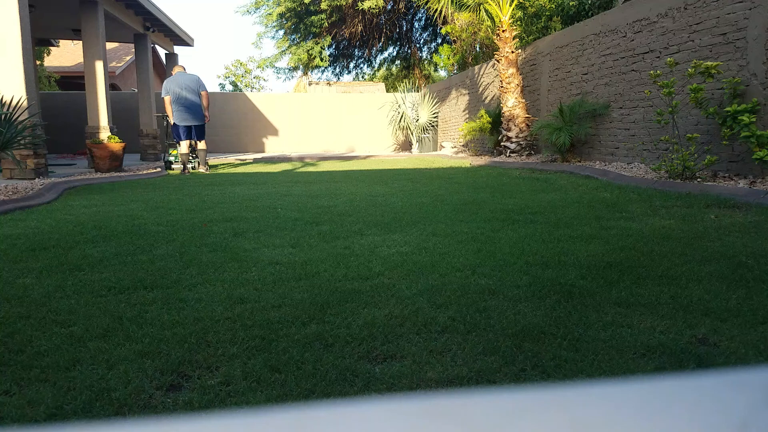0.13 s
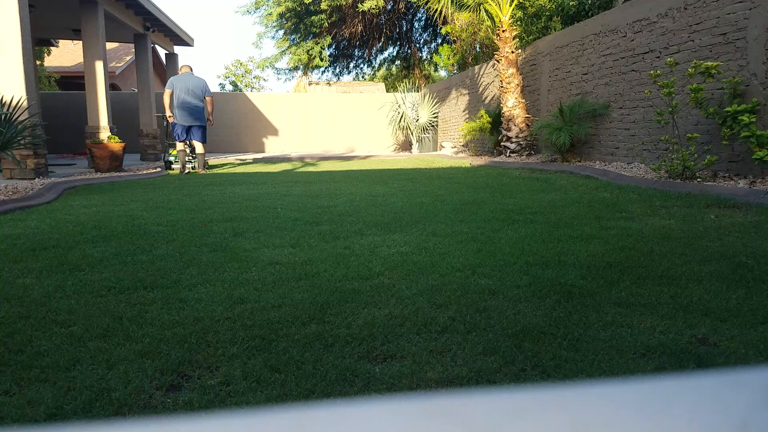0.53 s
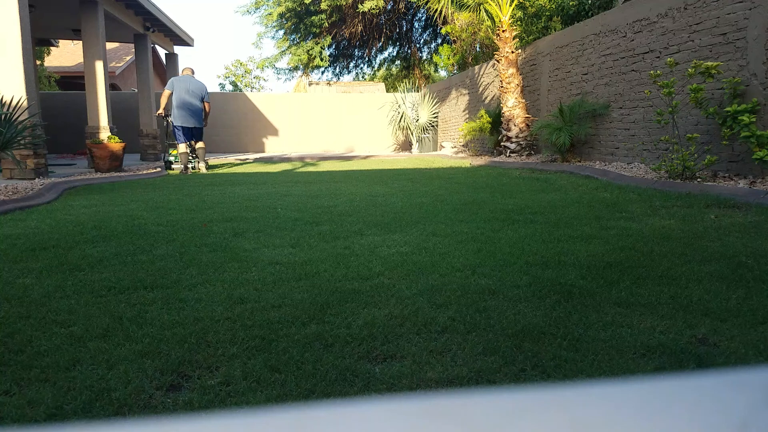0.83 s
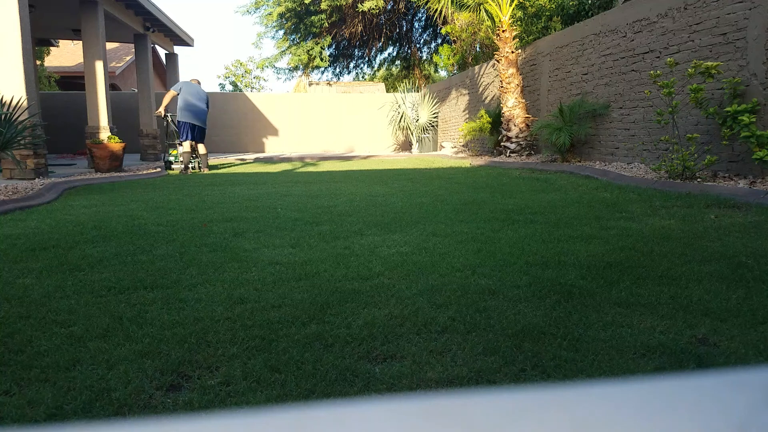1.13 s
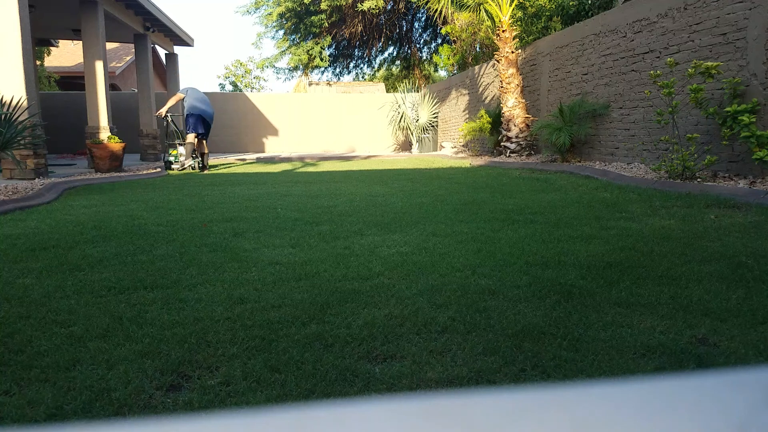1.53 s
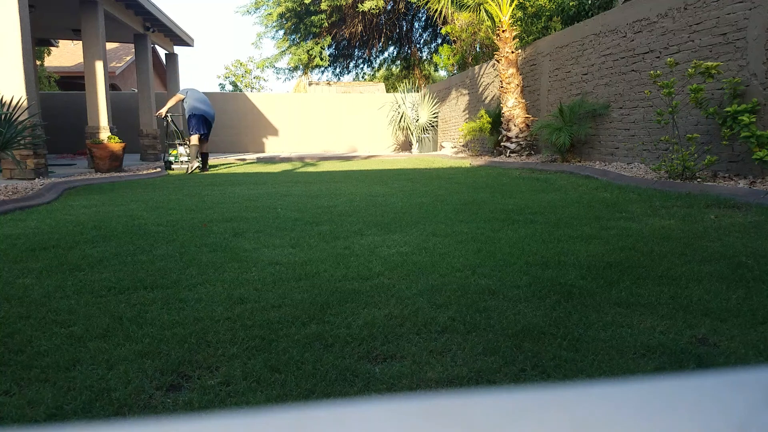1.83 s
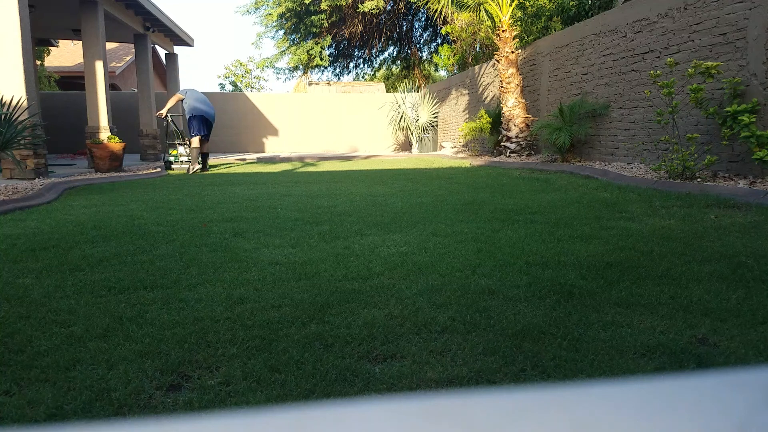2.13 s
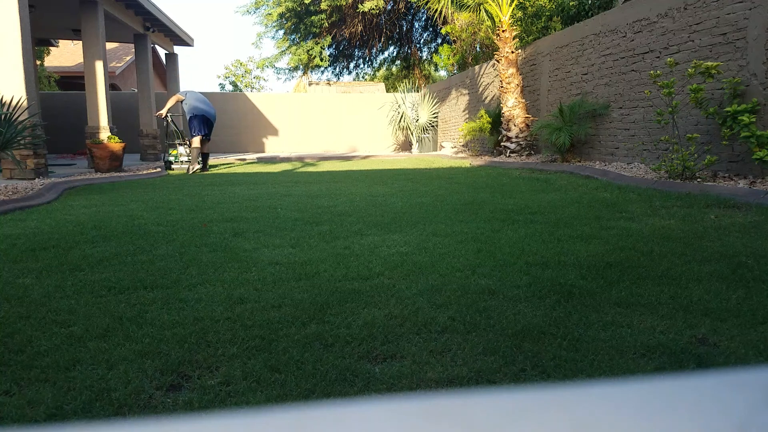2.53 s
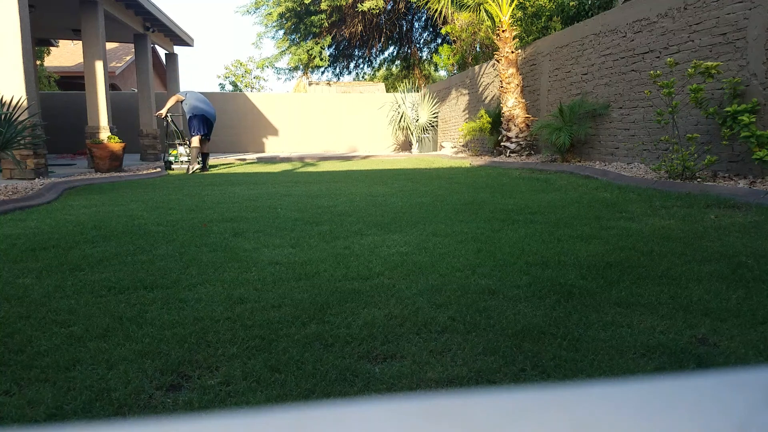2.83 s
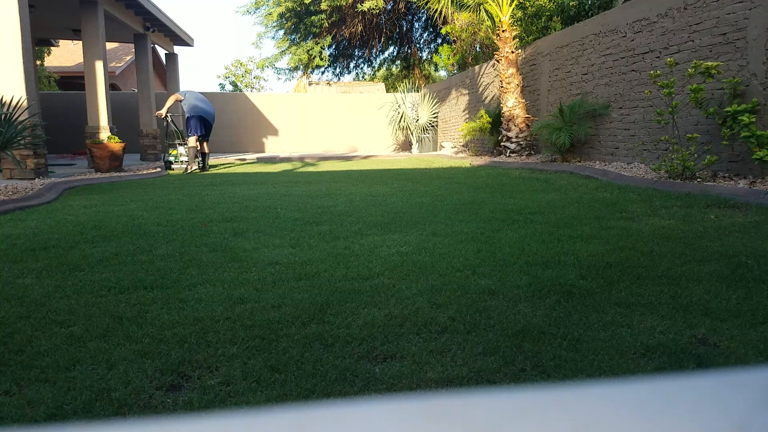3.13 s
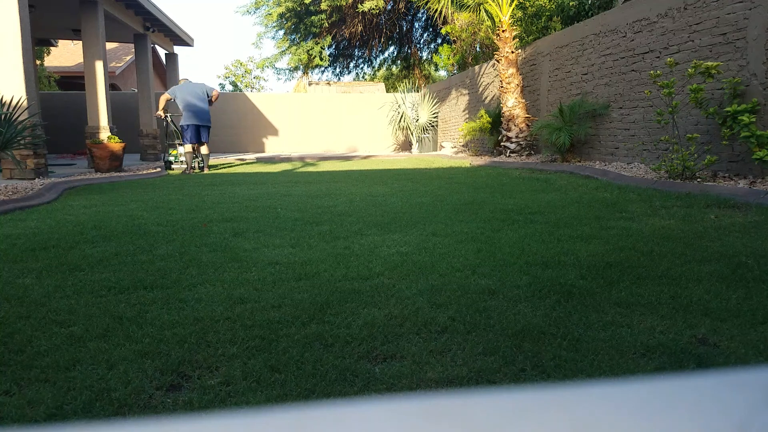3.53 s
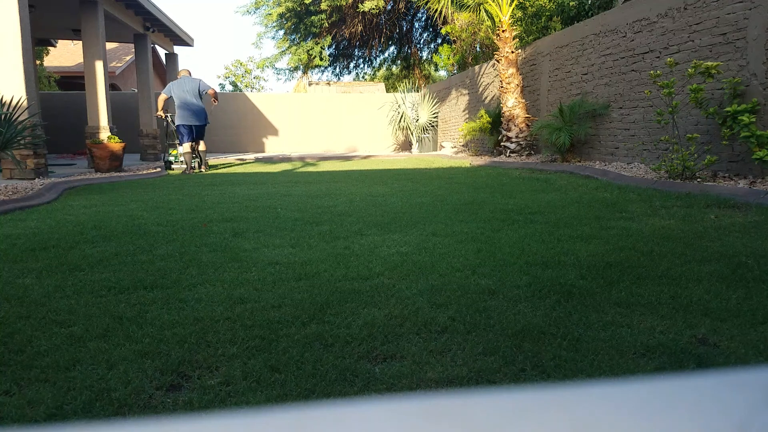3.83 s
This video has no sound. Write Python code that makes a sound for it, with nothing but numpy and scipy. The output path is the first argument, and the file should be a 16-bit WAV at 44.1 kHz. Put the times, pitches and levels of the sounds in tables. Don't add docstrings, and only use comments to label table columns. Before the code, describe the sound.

Petrol mower being started by rope at some distance: lever snap, long pause over a beating hum and far traffic, pawl knocks, steel deck rattle, hissing compressions and fast echoing exhaust blows, heard in stereo outdoors.

```python
import sys
import numpy as np
from scipy import signal
from scipy.fft import rfft, irfft, next_fast_len
from scipy.io import wavfile
from scipy.ndimage import map_coordinates

SR = 44100
rng = np.random.default_rng(int(sys.argv[2]) if len(sys.argv) > 2 else 0)


def gain_from_decibels(decibels):
    exponent = np.asarray(decibels, float) / 20
    return 10 ** exponent


def generate_wav(signal):
    frames = np.transpose(np.atleast_2d(signal))
    scaled = np.clip(frames, -1, 1) * 32767
    pcm = np.round(scaled).astype(np.int16)
    wavfile.write(sys.argv[1], SR, pcm)


N = 176400

# (time [s], level [dB], t60 [s])
PAWL_KNOCKS = [
    (2.998, -49.5, 0.72),
    (3.37, -42.5, 0.087),
    (3.458, -43.5, .12),
    (3.517, -32.5, 0.22),
    (3.629, -27.5, 0.03),
    (3.66, -33, .08),
]
# (frequency [Hz], width [Hz], level [dB])
DECK_MODES = [(260, 70, -6), (549, 90, 0), (715, 55, -2), (965, 60, -3), (1325, 55, -2), (3290, 150, -11),
              (4750, 120, -18)]


def unit(x):
    return x / np.sqrt(np.mean(x ** 2) + 1e-20)


def along(points, hz):
    f, v = np.transpose(points)
    return np.interp(np.log(hz + 1), np.log(f + 1), v)


def clock():
    return np.arange(N) / SR


def wobble(rate):
    knots = rng.standard_normal(int(N * rate / SR) + 4)
    return map_coordinates(knots, [np.arange(N) * rate / SR])


def filtered(x, response):
    m = next_fast_len(N + SR // 2)
    return irfft(rfft(x, m) * response(np.fft.rfftfreq(m, 1 / SR)), m)[..., :N]


def coloured(x, spectrum):
    return filtered(x, lambda hz: gain_from_decibels(along(spectrum, hz)))


def resonant(x, peaks):
    def response(f):
        total = 0
        for k, (centre, width, db) in enumerate(peaks):
            damping = 1j * f * width
            total = total + (-1) ** k * gain_from_decibels(db) * damping / (centre * centre - f * f + damping)
        return total
    return filtered(x, response)


def placed(x, lead_s, pan_db):
    side = np.array([[.5], [-.5]])
    return filtered(x * gain_from_decibels(pan_db * side), lambda hz: np.exp(2j * np.pi * hz * lead_s * side))


def dying(rows):
    t = clock()
    return sum((t >= s) * gain_from_decibels(db - 60 * np.maximum(t - s, 0) / t60) for s, db, t60 in rows)


def airy():
    common, left, right = rng.standard_normal((3, N))
    share = 0.15
    return np.sqrt(share) * common + np.sqrt(1 - share) * np.array([left, right])


def exhaust():
    # (time [s], peak level [dB])
    firings = [
        (3.662, -27),
        (3.711, -23),
        (3.7415, -15),
        (3.7925, -13.5),
        (3.8245, -13),
        (3.8635, -9),
        (3.9005, -10.5),
        (3.9345, -11.5),
        (3.968, -8.5),
    ]
    # (frequency [Hz], width [Hz], level [dB])
    muffler = [(330, 360, 0)]
    # (delay [s], level [dB], left over right [dB])
    walls = [(.0047, -5, 4), (.0113, -1, -3), (.0165, -8, 2), (.0215, -3, 0), (.0245, -7, -2), (.03, -9, 2)]
    # (frequency [Hz], width [Hz], level [dB])
    thud = [(49, 18, -4), (117, 39, 7.5)]
    scatter_db, scatter_s, thud_top_hz = 2, .0004, 143
    blows, push = np.zeros((2, N + SR)), np.zeros(N)
    chance = rng.standard_normal((len(firings), len(walls), 2))
    for (s, db), luck in zip(firings, chance):
        blows[:, round(s * SR)] -= gain_from_decibels(db)
        push[round(s * SR)] = gain_from_decibels(db)
        for (late, loss_db, pan_db), (u, v) in zip(walls, luck):
            echo_db = db + loss_db + scatter_db * u + np.array([.5, -.5]) * pan_db
            blows[:, round((s + late + scatter_s * v) * SR)] -= gain_from_decibels(echo_db)
    push = filtered(push, lambda hz: (1 + 1j * hz / thud_top_hz) ** -3.0)
    piped = blows[:, :N]
    for _ in range(3):
        piped = resonant(piped, muffler)
    return gain_from_decibels(39.5) * piped + gain_from_decibels(50) * resonant(push, thud)


def valve():
    # (centre time [s], half length [s], level [dB])
    puffs = [
        (3.716, 0.01, -24.5),
        (3.774, 0.0069, -22),
        (3.821, 0.0075, -21),
        (3.86, .009, -23),
        (3.898, 0.012, -26),
        (3.935, 0.0088, -24),
        (3.966, 0.022, -39.5),
        (4.003, 0.0055, -23.5),
    ]
    # (frequency [Hz], level [dB])
    hiss = [(880, -31), (1500, -7), (2920, -3), (3390, -5.5), (6410, -10), (7000, -16.5), (11400, -20.5),
            (13400, -13), (15700, -16.5)]
    t = clock()
    swell = 0
    for s, half_s, db in puffs:
        steepness = np.where(t < s, 1.8, 3.5)
        swell = swell + gain_from_decibels(db) * np.exp(-np.abs((t - s) / half_s) ** steepness)
    gas = airy()
    cover = gain_from_decibels(-9.5) * unit(resonant(gas[:, ::-1], [(3390, 220, 0)]))
    return swell * gain_from_decibels(1.4 * wobble(500)) * (unit(coloured(gas, hiss)) + cover)


def starter():
    # (time [s], level [dB])
    pull = [
        (3.3, -54.5),
        (3.388, -36.5),
        (3.398, -44),
        (3.474, -39.5),
        (3.506, -45.5),
        (3.522, -33),
        (3.53, -36.5),
        (3.85, -30),
        (4.0, -32),
    ]
    # (frequency [Hz], level [dB])
    rattle = [(88, -38), (150, -28), (551, -8), (832, -17), (1320, -17.5), (1440, -15.5), (3330, -24),
              (9000, -45), (11700, -74), (19800, -120)]
    ticks_hz, spread_db = 902, 3.5
    s, effort_db = np.transpose(pull)
    ticks = (rng.random(N) < ticks_hz / SR) * rng.standard_normal(N) * gain_from_decibels(spread_db * wobble(60))
    drive = unit(ticks) + 0.88 * rng.standard_normal(N)
    force = gain_from_decibels(np.interp(clock(), s, effort_db)) * np.clip((clock() - s[0]) / 0.4, 0, 1)
    force = force + gain_from_decibels(-4) * dying(PAWL_KNOCKS)
    strikes = unit(ticks) * np.sign(wobble(400)) + 0.74 * drive[::-1]
    return force * (unit(coloured(drive, rattle)) + gain_from_decibels(3) * unit(resonant(strikes, DECK_MODES)))


def knocks():
    taps = np.zeros(N)
    for s, db, _ in PAWL_KNOCKS[1:]:
        taps[round(s * SR)] = gain_from_decibels(db + 26)
    return resonant(taps, DECK_MODES)


def clutch():
    # (time [s], level [dB], t60 [s])
    scrapes = [
        (3.014, -61, .1),
        (3.026, -54, 0.24),
        (3.44, -60, 2),
        (3.494, -47, 0.19),
        (3.536, -36.5, 0.08),
        (3.574, -36.5, 0.19),
        (3.658, -32, 0.12),
        (3.537, -40.5, 5),
    ]
    # (frequency [Hz], level [dB])
    grit = [(1180, -10), (2000, -1.5), (5520, -9.5), (6130, -7), (6790, -10.5), (8800, -7), (11300, -14.5),
            (13400, -6), (15700, -7.5)]
    return dying(scrapes) * gain_from_decibels(1.8 * wobble(250)) * unit(coloured(airy(), grit))


def lever():
    # (time [s], level [dB], t60 [s])
    clicks = [
        (1.881, -33.5, 0.072),
        (1.889, -32.5, 0.02),
        (1.928, -43.5, 0.11),
        (2.499, -64, 0.044),
    ]
    # (frequency [Hz], level [dB])
    click_colour = [(350, -66), (600, -18), (1040, 3), (2510, -8), (3840, -12), (4460, -25.5), (5630, -6.5),
                    (8250, -17), (15700, -22.5)]
    # (frequency [Hz], width [Hz], level [dB])
    lever_modes = [(1100, 150, 5), (2750, 250, -6), (3900, 400, -4), (5400, 500, 0)]
    noise = rng.standard_normal(N) * gain_from_decibels(1.2 * wobble(300))
    body = unit(coloured(noise, click_colour)) + gain_from_decibels(1) * unit(resonant(noise[::-1], lever_modes))
    return gain_from_decibels(-4) * dying(clicks) * body


def court(x):
    # (frequency [Hz], t60 [s])
    decay = [(150, 1), (1000, 0.92), (5000, 0.48), (14000, 0.14)]
    mono_hz = 324
    hz, t, z = signal.stft(rng.standard_normal((2, SR // 2)), SR, nperseg=256)
    alike = 1 / (1 + (hz[:, None] / mono_hz) ** 2)
    z[1] = alike * z[0] + np.sqrt(1 - alike ** 2) * z[1]
    fading = gain_from_decibels(-60 * t / along(decay, hz)[:, None])
    tail = signal.istft(z * fading, SR, nperseg=256)[1]
    late = np.pad(x, (300, 0))[None]
    return signal.fftconvolve(late, tail / np.linalg.norm(tail[0]), axes=1)[:, :N]


def hum():
    # (multiple of shaft rate, level [dB])
    orders = [(1, -40.5), (2, -45), (3, -58), (4.19, -61.5), (12, -62.5), (15, -64)]
    shaft_hz, mains_hz, beat_null_s, sway_db = 58.6, 120.0, .092, 1.68
    t = clock() - beat_null_s
    shaft = 0
    for k, db in orders:
        level = gain_from_decibels(db + sway_db * k ** 0.14 * wobble(3 + 1.5 * k))
        shaft = shaft + level * np.sin(2 * np.pi * k * shaft_hz * t)
    mains = -gain_from_decibels(-41 + sway_db * wobble(4.8)) * np.sin(2 * np.pi * mains_hz * t)
    return placed(np.sqrt(2) * (shaft + mains), .0003, -1.5)


def yard():
    # (frequency [Hz], level [dB per Hz])
    rush_colour = [(15, -33), (25, -6.5), (124, -5.5), (211, -12), (565, -18), (874, -17.5), (980, -19),
                   (1100, -19), (6000, -54), (7800, -86), (13200, -120)]
    # (frequency [Hz], correlation)
    likeness = [(60, 1), (250, 0.51), (700, 0.98), (1500, 0.24), (3500, 0.15)]
    # (frequency [Hz], level [dB])
    gust_colour = [(20, -11), (60, -7), (140, -4.5), (220, -22), (400, -65.5)]
    gust_s, gust_wide_s, gust_db = 1.555, 0.057, -36.5

    def mid_side(hz):
        turn = np.arccos(np.clip(along(likeness, hz), -1, 1)) / 2
        return gain_from_decibels(along(rush_colour, hz)) * [np.cos(turn), np.sin(turn)]

    mid, side = filtered(rng.standard_normal((2, N)), mid_side)
    rush = gain_from_decibels(-43 + .5 * wobble(4.7)) * unit(np.array([mid + side, mid - side]))
    air = 0.83 * rng.standard_normal(N) + rng.standard_normal((2, N))
    swell = np.exp(-((clock() - gust_s) / gust_wide_s) ** 2)
    gust = gain_from_decibels(gust_db) * swell * unit(coloured(air, gust_colour))
    return placed(rush, .00038, -1.3) + gust


def cricket():
    wing_hz, wing_wide_hz, teeth_hz = 7140, 800, 248
    chirp_hz, first_s, long_s = 10.56, .08, .011
    t = clock()
    turn = ((t - first_s) * chirp_hz + .5) % 1 - .5
    gate = np.exp(-(turn / chirp_hz / long_s) ** 2) * gain_from_decibels(1.5 * wobble(6.12))
    teeth = np.cos(np.pi * teeth_hz * t) ** 6 * gain_from_decibels(5.6 * wobble(260))
    rough = 1 + 1.1 * rng.standard_normal(N)
    strokes = gate * teeth * rough * np.sin(2 * np.pi * wing_hz * t)
    return placed(gain_from_decibels(-76) * unit(resonant(strokes, [(wing_hz, wing_wide_hz, 0)])), .0001, 0.85)


def scene():
    # (frequency [Hz], left over right [dB])
    mower_pan = [(200, -3), (1500, -1.5), (4000, -0.5), (8000, 2.5), (13000, 6)]
    bangs = exhaust()
    deck = starter() + knocks()
    bright = lever() + clutch() + valve()
    wet = court(gain_from_decibels(-6) * bangs.mean(0) + gain_from_decibels(-6.5) * (deck + bright.mean(0)))
    heard = placed(bangs + deck, 0.00019, 0) + placed(bright, 0.000294, 0) + wet
    heard = filtered(heard, lambda hz: gain_from_decibels(along(mower_pan, hz) * [[.5], [-.5]]))
    return heard + hum() + yard() + cricket()


def low_pass(x):
    return signal.sosfilt(signal.butter(12, 15810, fs=SR, output="sos"), x)


def record(dry):
    # (frequency [Hz], level [dB])
    self_noise = [(1500, -16), (4000, 5.5), (9000, 3), (12000, 3), (14000, 7), (15800, -1)]
    # (frequency [Hz], level [dB])
    wind_cut = [(60, -10), (130, -13.5), (250, -2.5), (500, -0.5)]
    cut_s, cut_takes_s, start_s = 1.5, 0.59, .0724
    low_hz, top_hz = 39, 15850
    share = np.clip((clock() - cut_s) / cut_takes_s, 0, 1) ** 1.1
    dry = dry + gain_from_decibels(-67.5) * unit(coloured(rng.standard_normal(dry.shape), self_noise))
    x = (1 - share) * dry + share * coloured(dry, wind_cut)
    x = filtered(x, lambda hz: (hz < top_hz) / np.sqrt(1 + (low_hz / (hz + 1)) ** 6))
    x = x * np.clip((clock() - start_s) / 0.0008, 0, 1)
    return low_pass(x)


dry = scene()
out = record(dry)
generate_wav(out)
```